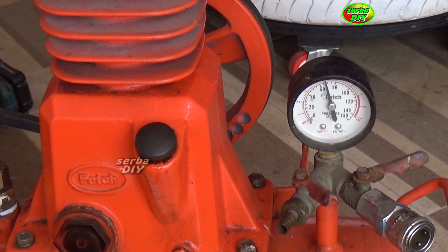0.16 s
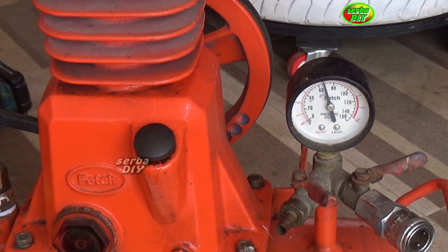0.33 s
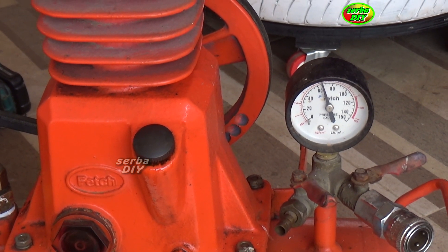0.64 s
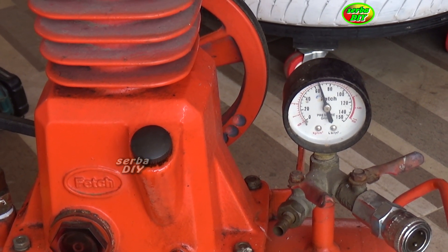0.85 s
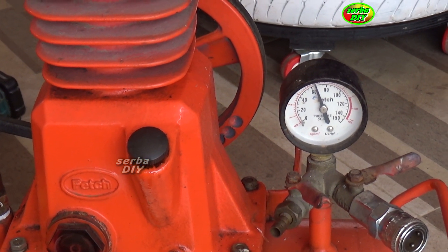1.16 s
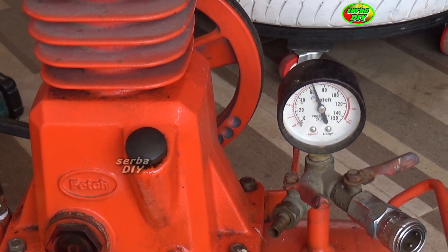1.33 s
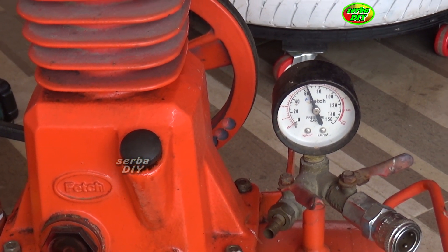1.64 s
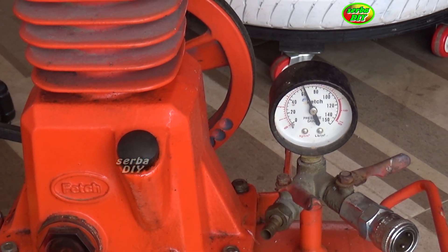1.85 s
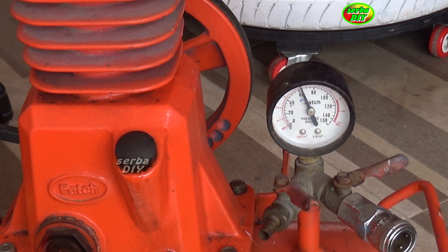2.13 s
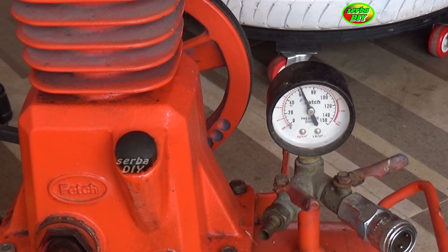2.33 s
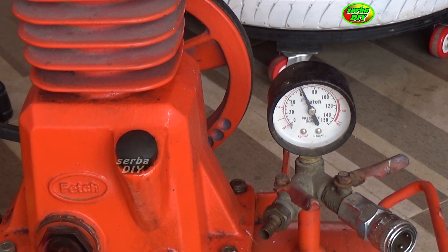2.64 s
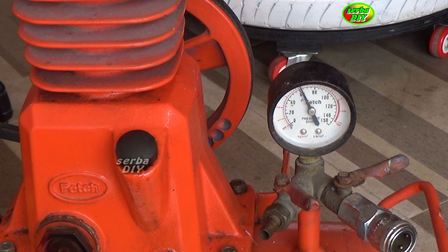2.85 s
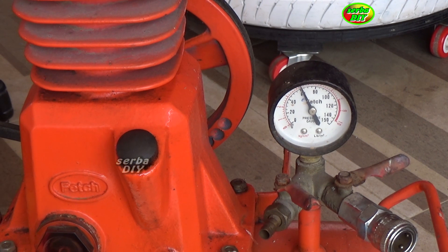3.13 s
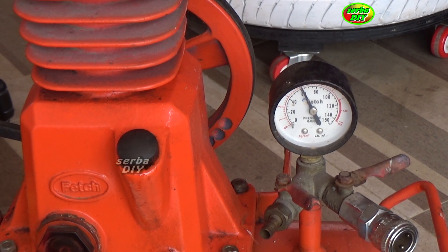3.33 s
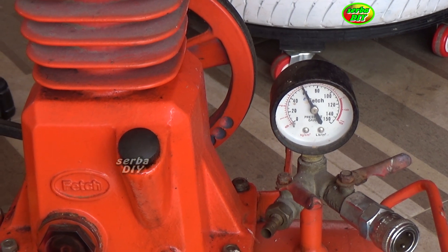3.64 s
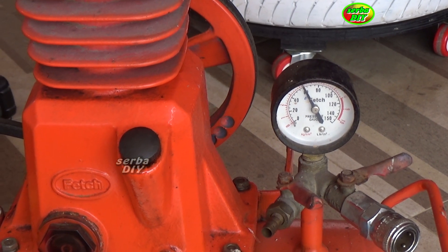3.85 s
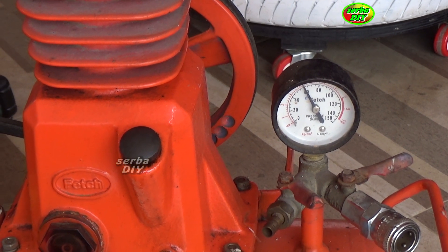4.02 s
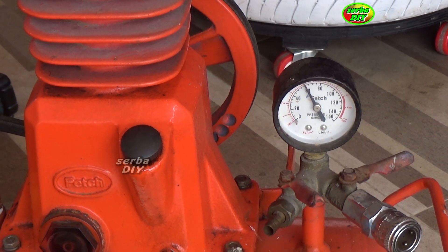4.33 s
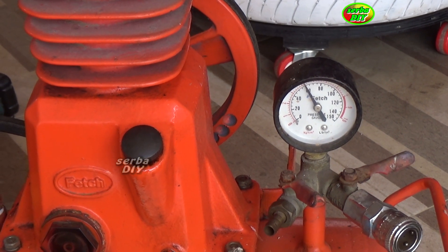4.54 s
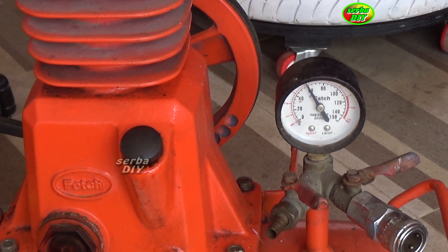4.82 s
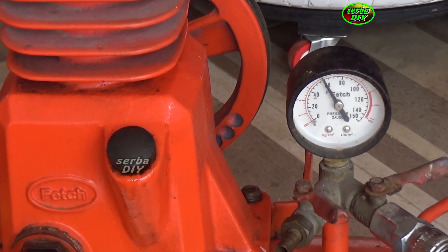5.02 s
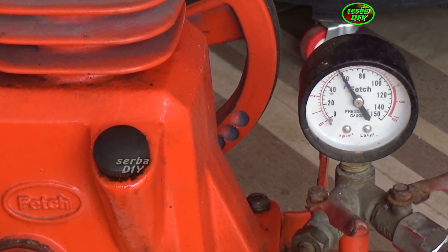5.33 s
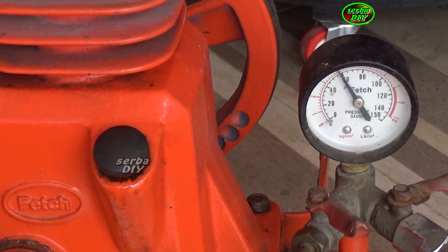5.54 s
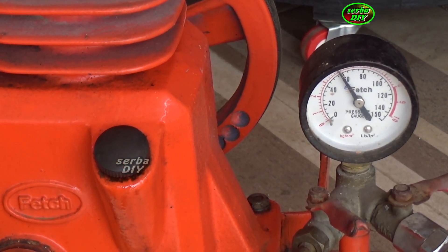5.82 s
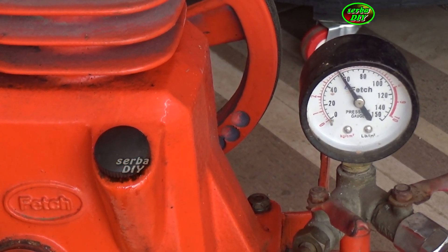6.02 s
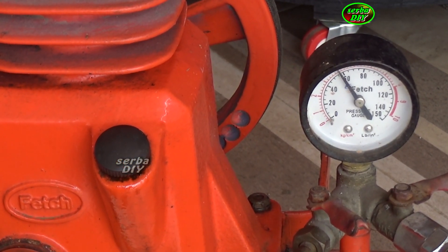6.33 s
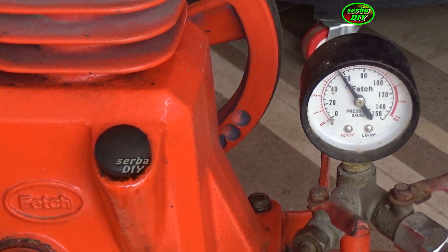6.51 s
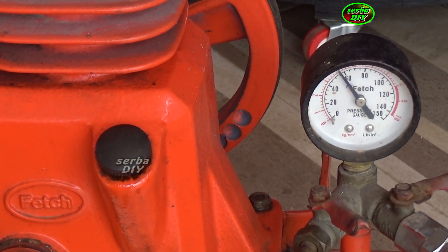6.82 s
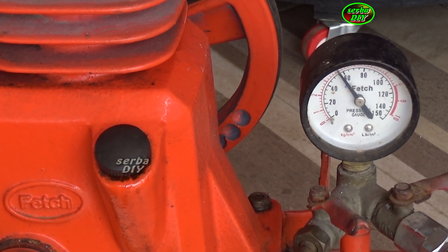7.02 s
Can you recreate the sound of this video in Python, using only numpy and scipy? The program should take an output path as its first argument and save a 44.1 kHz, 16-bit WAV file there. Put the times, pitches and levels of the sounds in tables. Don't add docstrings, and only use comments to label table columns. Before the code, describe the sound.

From 0 to about 7 seconds, a tank's compressed air escapes continuously through a small valve. The hiss starts at full strength, with no opening burst, and is still running at the end. It is bright and sibilant, strongest around seven to nine kilohertz, with thin lows and a smooth airy top. Tiny rapid flutters roughen it, and its level sags almost imperceptibly. The microphone is close; the jet sits slightly right of centre, and short reflections from metal and tiled floor give it a fixed, hollow, comb-like colour without a distinct echo. Far away and nearly buried, a thin motor tone wavers near 670 hertz briefly at 0.2 and 2.5 seconds, climbs slowly towards 690 from 4.7 to 6.5, and returns at 6.9. A minute steady mains hum lies beneath everything.

```python
import sys
import numpy as np
from scipy import signal
from scipy.fft import rfft, irfft, next_fast_len
from scipy.io import wavfile
from scipy.ndimage import uniform_filter1d

SR = 44100
rng = np.random.default_rng(int(sys.argv[2]) if len(sys.argv) > 2 else 0)


def to_wav(sig):
    pcm = np.clip(np.atleast_2d(sig), -1, 1) * 32767
    pcm = np.round(pcm).astype(np.int16)
    wavfile.write(sys.argv[1], SR, pcm.T)


def amplitude_ratio(level_db):
    exponent = np.asarray(level_db, float) / 20
    return 10 ** exponent


N = 316197


def evened(x):
    return x / np.sqrt(np.mean(x ** 2) + 1e-20)


def read_curve(points, hz):
    f, value = np.transpose(points)
    return np.interp(np.log(hz + 1), np.log(f + 1), value)


def wander(frames, bins, along, across):
    field = rng.standard_normal((frames, bins))
    smooth_in_time = uniform_filter1d(field, along, 0)
    return evened(uniform_filter1d(smooth_in_time, across, 1)).T


def jet():
    window, hop = 256, 64
    roar_top_hz, fizz_foot_hz = 5600, 11000
    sag_db_per_s, roar_sag_db_per_s = -0.05, -0.2
    frames, hz = N // hop + 5, np.fft.rfftfreq(window, 1 / SR)
    t = np.arange(frames) * hop / SR
    roar = 1 / (1 + (hz / roar_top_hz) ** 8)
    fizz = 1 / (1 + (fizz_foot_hz / (hz + 1)) ** 12)
    upper_roar = roar / (1 + (3200 / (hz + 1)) ** 6)
    level_db = np.outer(sag_db_per_s + roar_sag_db_per_s * upper_roar, t - t.mean())

    slow_db = 0.088 + 0.09 * roar + 0.26 * fizz
    level_db += slow_db[:, None] * wander(frames, len(hz), along=30, across=20)
    quick_db = 0.14 + 1.18 * roar * hz / (hz + 500) + 1.46 * fizz
    level_db += quick_db[:, None] * wander(frames, len(hz), along=5, across=50)
    draught_db = 2.8 / (1 + (hz / 160) ** 2)
    level_db += draught_db[:, None] * wander(frames, 1, along=45, across=1)

    a, b, c, d = rng.standard_normal((frames, len(hz), 4)).T
    spectra = np.array([a + 1j * b, c + 1j * d]) * amplitude_ratio(level_db)
    return signal.istft(spectra, nperseg=window, noverlap=window - hop)[1][:, :N]


def surroundings(noise):
    # f/Hz, level/dB per Hz
    jet_colour = [(20, -52), (290, -46.5), (700, -34), (1100, -23), (1700, -21), (2400, -16.5),
                  (4700, -13.5), (6000, -9), (7300, 0), (9000, -0.4), (10500, -8), (12300, -10),
                  (14000, -9.5), (15700, -15)]
    echoes = [(318, 0.189), (567, 0.067), (648, 0.061), (856, -0.027), (1187, -0.049), (1642, 0.203),
              (1669, -0.065), (1815, -0.029), (2138, 0.061), (2547, 0.023), (2618, -0.033), (2998, -0.022),
              (3087, 0.036), (3432, -0.027), (3795, 0.02), (4069, -0.029), (4578, 0.029), (5354, -0.029),
              (5993, -0.019), (6204, 0.027)]
    # f/Hz, level/dB
    port_difference = [(60, -11), (420, -5.5), (750, -11), (1600, -20), (3800, -15), (6800, -27.5),
                       (9300, -16.5), (12300, -24)]
    # f/Hz, share/1
    tied_share = [(60, .1), (600, 0.46), (4000, 0.54), (7500, 0), (9200, 0.84), (10500, 0.7), (12500, .2)]
    flow_db, edge_hz = -24, 15745
    size = next_fast_len(N)
    hz = np.fft.rfftfreq(size, 1 / SR)
    common, stray = rfft(noise, size) * amplitude_ratio(read_curve(jet_colour, hz))

    scattered = 1 / (1 + (480 / (hz + 1)) ** 4)
    warm = 1 + 0.92 / (1 + (hz / 3140) ** 2)
    comb = sum(gain * np.exp(-2j * np.pi * hz * us / 1e6) for us, gain in echoes)
    common = common * (1 + warm * scattered * comb)

    lag = np.arange(2000) / SR
    tail = rng.standard_normal(len(lag)) * amplitude_ratio(-60 * lag / 0.071) * (lag > 0.004)
    tail = tail / np.linalg.norm(tail)
    common = common * (1 + amplitude_ratio(-19) * scattered * rfft(tail, size))

    band = (hz < edge_hz) * amplitude_ratio(-4 * np.clip((hz - 15250) / 150, 0, 1))
    common, stray = common * band, stray * band

    tied = np.clip(read_curve(tied_share, hz), 0, 1)
    coherent = -tied * np.exp(1.0j) * common
    incoherent = np.sqrt(1 - tied ** 2) * stray
    side = amplitude_ratio(read_curve(port_difference, hz)) * (coherent + incoherent)
    mid, side = irfft(np.array([common, side]), size)[:, :N]
    loudness = amplitude_ratio(flow_db + 0.71) / np.std(mid)
    return loudness * np.array([mid + side, mid - side])


def distant_motor():
    # t/s, duration/s, level/dB, f/Hz at the start
    spells = [
        (.15, .3, -74, 664),
        (2.5, 0.26, -72, 674),
        (4.702, 1.8, -73, 641),
        (6.9, .4, -72, 680),
    ]
    free_hz, spin_up_s, swell_s = 700, 1.5, 0.15
    t = np.arange(N) / SR
    waver_hz = 3.5 * evened(uniform_filter1d(rng.standard_normal(N), size=2000))
    fading_db = 2.8 * evened(uniform_filter1d(rng.standard_normal(N), size=2400))
    whine = np.zeros(N)
    for start, length, db, start_hz in spells:
        climb = np.exp(-np.maximum(t - start, 0) / spin_up_s)
        hz = free_hz - (free_hz - start_hz) * climb
        inside_s = np.minimum(t - start, start + length - t)
        swell = np.clip(inside_s / swell_s + 0.5, 0, 1)
        phase = 2 * np.pi * np.cumsum(hz + waver_hz) / SR
        whine += swell * amplitude_ratio(db + fading_db) * np.sin(phase)
    return np.sqrt(2) * whine


def mains_hum():
    # f/Hz, level/dB
    harmonics = [(300, -90), (500, -81.5)]
    t = np.arange(N) / SR
    return np.sqrt(2) * sum(amplitude_ratio(db) * np.sin(2 * np.pi * f * t) for f, db in harmonics)


def scene():
    return surroundings(jet()) + distant_motor() + mains_hum()


def low_pass(x):
    return signal.sosfilt(signal.butter(12, 15790, fs=SR, output="sos"), x)


def record(dry):
    mix = 0.45 * np.tanh(dry / 0.45)
    return low_pass(mix)


dry = scene()
out = record(dry)
to_wav(out)
```